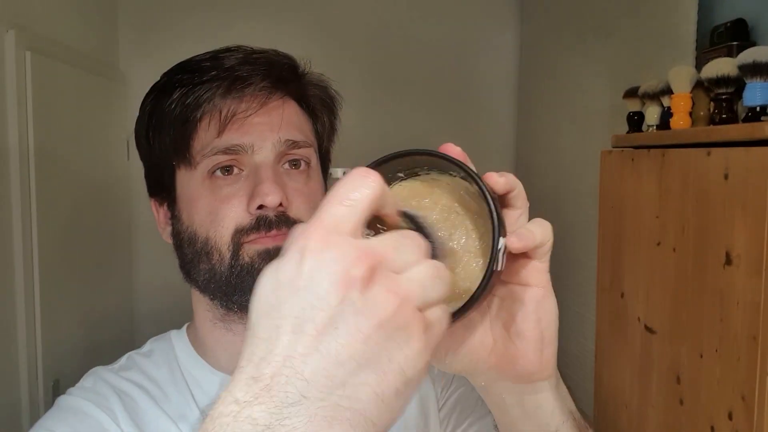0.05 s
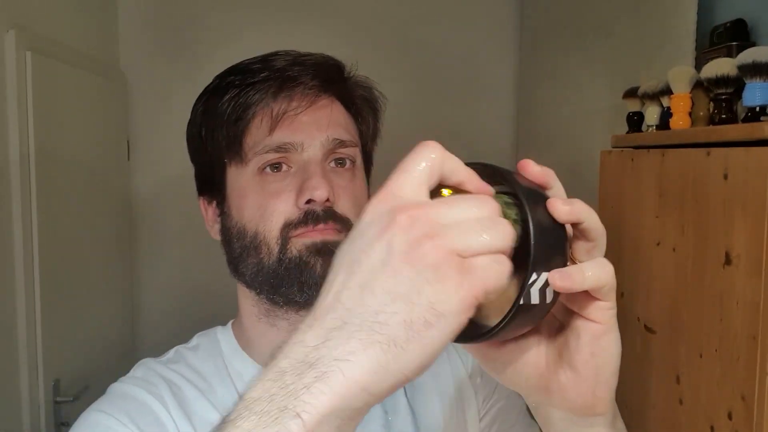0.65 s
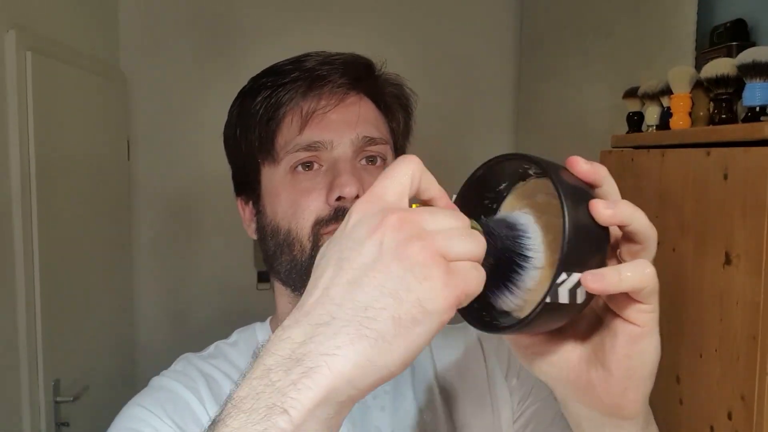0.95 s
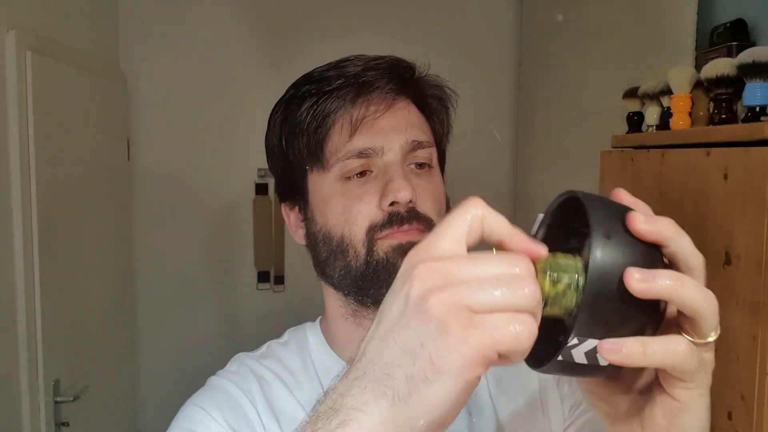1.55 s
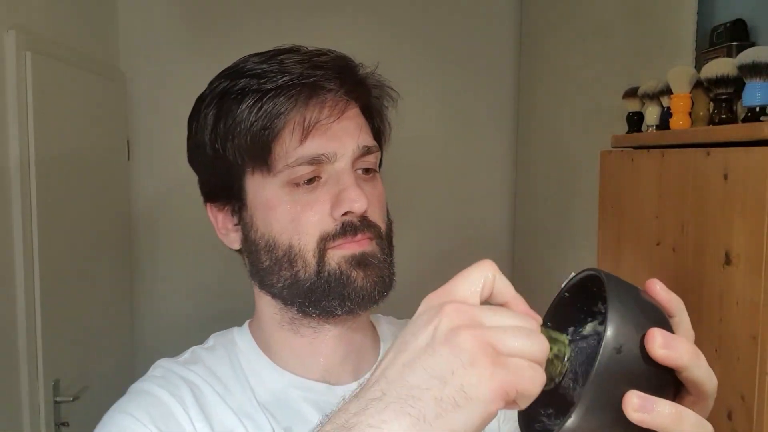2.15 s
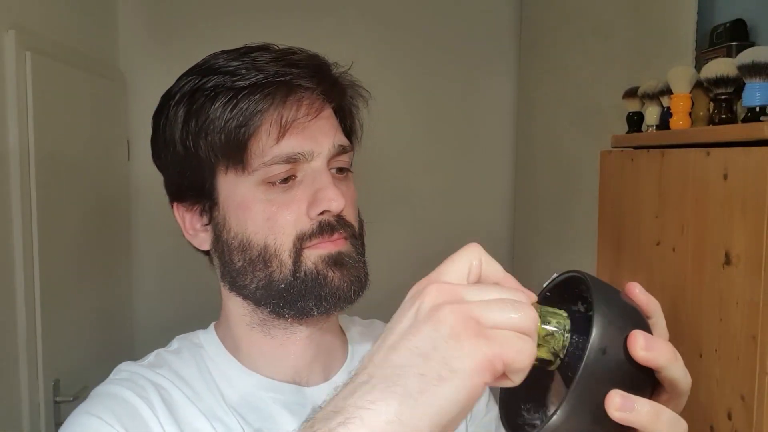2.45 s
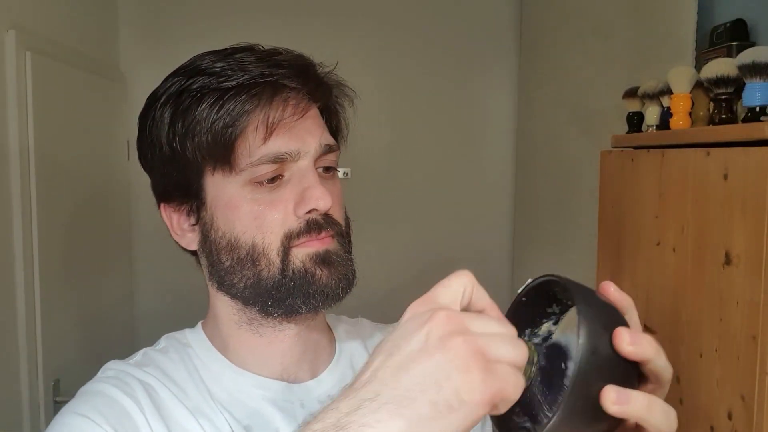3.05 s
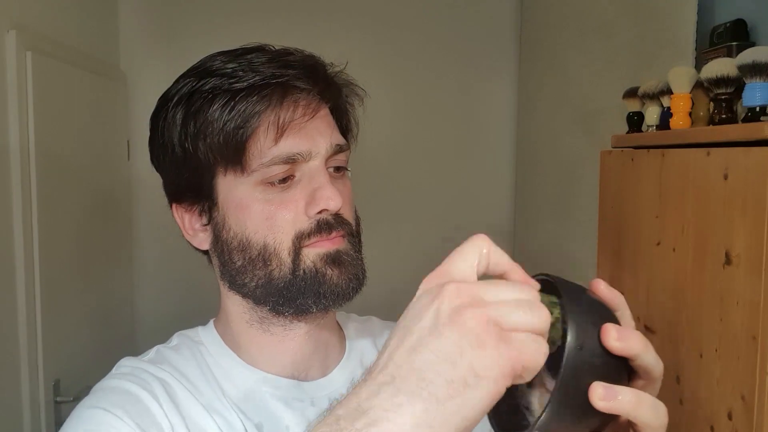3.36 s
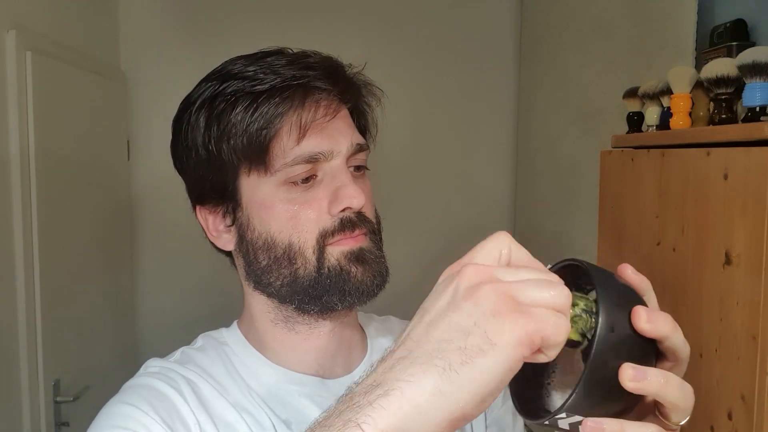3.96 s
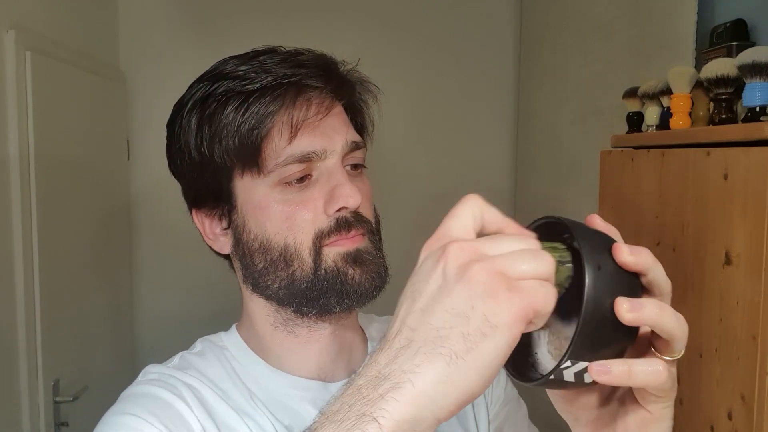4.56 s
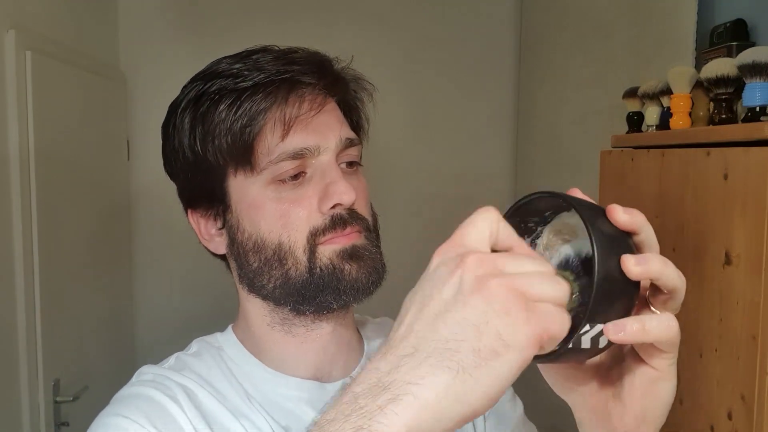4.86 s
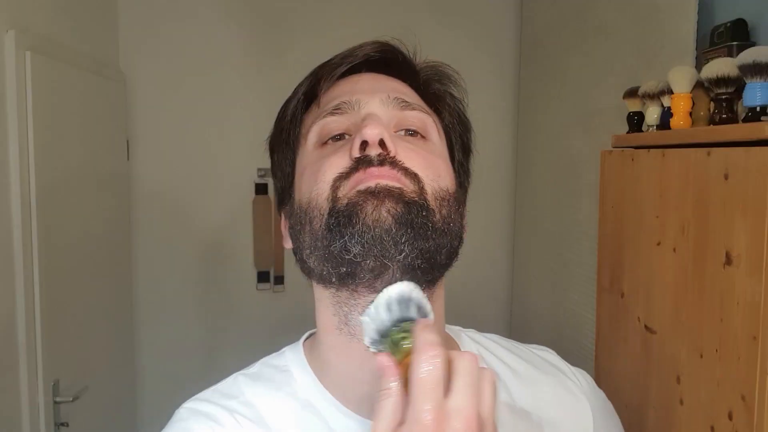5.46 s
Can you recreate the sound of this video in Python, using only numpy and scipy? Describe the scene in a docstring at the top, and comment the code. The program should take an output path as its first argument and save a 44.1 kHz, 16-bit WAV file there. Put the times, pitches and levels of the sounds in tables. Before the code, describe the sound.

In a small, quiet bathroom, a light ceramic clink opens a run of fast, soft brush sweeps in a bowl of shaving soap, with bristles flicking. Two bright knocks of the handle on the bowl stand out as the loudest sounds. Firmer, rhythmic turns follow, the foam fizzing, squelching and popping nearby, before a brief, faint rub and scratch of the brush on beard and skin.

```python
"""Whipping up shaving lather

A damp brush swirls over soap in a hand-held ceramic bowl in a small bathroom, lightly, then firmly.
Tiny bubbles break and sound the hollow of the bowl, lather squelches and pops, bristles hiss and flick.
The handle clinks on the bowl three times. At the end the brush rubs the lather into a bearded neck."""
import sys
import numpy as np
from scipy import signal
from scipy.fft import rfft, irfft
from scipy.io import wavfile

SR = 44100
rng = np.random.default_rng(int(sys.argv[2]) if len(sys.argv) > 2 else 0)


def file_out(sig):
    """Save sig as 16-bit WAV at sys.argv[1]."""
    # one column per channel
    cols = np.atleast_2d(sig).T
    # limit, then scale
    lim = np.clip(cols, -1, 1)
    pcm = np.round(lim * 32767).astype(np.int16)
    wavfile.write(sys.argv[1], SR, pcm)


N = 251811
TIME = np.arange(N) / SR
HZ = np.maximum(np.fft.rfftfreq(N, 1 / SR), 1)
NECK_START_S = 5.258

# Levels are relative: the functions add their own gains. t60 is the time a sound takes to fade by 60 dB.
# light sweeps over the soap, about eight a second: t/s, hiss/dB, lather/dB
LIGHT_SWEEPS = [(0.035, -66.5, -82), (0.15, -72.5, -91), (0.263, -72.5, -92), (0.399, -71.5, -89),
                (0.479, -76.5, -91.5), (0.529, -73.5, -84), (0.664, -65, -72.5), (0.715, -74, -71.5),
                (0.864, -70, -83), (0.938, -68, -70), (1.03, -72.5, -84), (1.075, -67.5, -77.5),
                (1.182, -63.5, -67.5), (1.265, -73, -65.5), (1.403, -72, -73), (1.475, -75.5, -71),
                (1.575, -84, -73), (2.234, -74, -73), (2.382, -82, -67.5), (2.445, -80, -68)]
# firm turns, about four a second, each a push and a return:
# t/s, push/dB, rise/s, return delay/s, return/dB, squelch/dB, hiss/dB
FIRM_TURNS = [(2.685, -60, 0.017, 0.094, -63.5, -71, -73), (2.914, -54, 0.02, 0.096, -62, -74.5, -69.5),
              (3.154, -54.5, 0.017, 0.1, -61, -71, -71), (3.378, -58.5, 0.028, 0.068, -58, -68.5, -73),
              (3.653, -55.5, 0.049, 0.12, -61, -72, -77), (3.875, -59.5, 0.025, 0.065, -65, -68, -86),
              (4.208, -56, 0.045, 0.063, -65, -73.5, -75.5), (4.458, -56.5, 0.065, 0.12, -57, -71, -75),
              (4.678, -55, 0.035, 0.11, -58, -62, -71), (4.885, -57, 0.064, 0.13, -58.5, -66.5, -73.5),
              (5.11, -60, 0.051, 0.115, -58.5, -64, -72.5)]
# notes of the air in the bowl: f/Hz, width/Hz, level under a firm brush/dB, under a light brush/dB
BOWL_AIR_NOTES = [(838, 41, 4, -2.5), (1109, 83, 0.5, 1), (1228, 250, -6.5, -2.5), (1375, 66, 1.5, -1.5),
                  (1610, 75, -7.5, -9), (2145, 160, -13, -5.5), (2557, 220, -10.5, -5),
                  (3525, 290, -10.5, -9.5)]
# pockets of lather bursting: t/s, level/dB, f/Hz
LATHER_POPS = [(1.21, -62, 1153), (2.899, -50, 1640), (3.143, -49, 854), (3.649, -50, 837),
               (4.047, -52, 1310), (4.208, -47, 1335), (4.446, -44.5, 964), (4.606, -44.5, 1090),
               (4.677, -45, 1270), (4.881, -42.5, 1217), (5.104, -43, 824), (5.112, -41.5, 833),
               (5.221, -48, 1160)]
# tufts of bristles springing free: t/s, level/dB
TUFT_FLICKS = [(0.6515, -38), (0.6553, -36.5), (0.659, -45), (0.714, -45), (0.8644, -40), (0.931, -39),
               (1.0236, -57.5), (1.0787, -46), (1.1744, -47), (5.2927, -44.5)]
# handle hitting the bowl: t/s, ring/dB, brightness/dB per octave, spot (0 rim, 1 inner wall), knock/dB
HANDLE_HITS = [(-0.016, -21.5, -4, 0.54, -28), (1.6428, -9.5, 1.8, 0.27, -11),
               (1.6514, -14, -6, 0.11, -22.5), (1.9807, -14, 2.1, 0.82, -11.5), (1.9856, -20, -2, 1, -14.5)]
# notes of the bending ceramic: f/Hz, level hit on the rim/dB, on the wall/dB, t60/s, left minus right/dB
CERAMIC_NOTES = [(1610.6, -3.5, -0.5, 0.67, -1), (1696, -14, -16, 0.12, -3.5),
                 (3700, -7.5, -28, 0.31, -10.5), (3797, -12, -10, 0.24, -2.5),
                 (6484, -18.5, -16.5, 0.2, -7), (9726, -24.5, -25.5, 0.066, -11),
                 (13400, -39.5, -26, .1, -5.5)]
# strokes over the beard: t/s, level/dB
BEARD_STROKES = [(5.299, -68), (5.39, -64), (5.468, -68), (5.515, -69.5), (5.61, -66.5), (5.695, -67.5)]

# tone colours, or how strong each pitch is in a noise: f/Hz, level/dB
LATHER_COLOUR = [(400, -18), (750, -4.5), (1200, 2), (2300, -1.5), (3000, -6.5), (3700, -3), (5500, -9.5),
                 (6600, -14), (7400, -26), (9000, -17), (15000, -29)]  # breaking bubbles
SQUELCH_COLOUR = [(100, -22), (250, -1), (450, 4.5), (650, 10.5), (900, -5.5), (1600, -25)]  # squeezed lather
BRISTLE_COLOUR = [(1500, -11), (3000, -8), (4200, 0), (6200, -1), (7400, -6.5), (8800, 1.5), (11500, -2),
                  (13500, 1), (15000, -8.5), (16000, -8.5)]  # sliding tips
KNOCK_COLOUR = [(100, -40), (400, -17), (800, -13), (1200, -3.5), (1500, 10), (2000, 4), (2600, -2.5),
                (3200, -10), (4000, -0.5), (5500, -19), (6700, -14), (7500, -41.5), (13800, -21.5),
                (15500, -45)]  # handle meeting ceramic
SKIN_COLOUR = [(53, -34), (90, -17), (214, 4), (247, -9), (382, 0.5), (758, -3), (931, -2), (1290, -11),
               (1600, -1), (2080, -26), (3520, -120)]  # rubbed skin
BEARD_COLOUR = [(800, 1), (1600, -0.5), (2600, -4.5), (4000, -4), (6000, -7.5), (7500, -26), (12000, -27)]  # scratched beard
AIR_COLOUR = [(25, -13), (50, -3.5), (75, 9), (110, -4.5), (155, -0.5), (250, -4.5), (600, -13.5),
              (950, -13.5), (1250, -4.5), (2800, -19.5), (5000, -8), (7300, -15.5), (13500, -10.5),
              (15500, -19)]  # the quiet room

# how long the bathroom echoes: f/Hz, t60/s
ECHO_TIMES = [(150, 0.77), (400, 0.55), (1500, .41), (4000, 0.38), (7000, .35), (14000, 0.33)]
# standing waves, low notes that linger between the walls: f/Hz, level/dB, t60/s
ROOM_NOTES = [(150, -1, 0.92), (220, 1.5, 0.94), (231, -2, .5), (352.3, -0.5, 0.63), (417, -1.5, 0.51)]
# which side is louder: f/Hz, left minus right/dB
STEREO_BALANCE = [(60, -5.5), (110, -2), (200, -5.5), (380, 0.5), (700, -8), (1290, -4), (2380, -3.5),
                  (4400, -15.5), (8120, -12.5), (15000, -21)]
# how alike left and right are: f/Hz, likeness (1 the same, 0 unrelated)
STEREO_LIKENESS = [(60, 0.86), (130, 0.29), (290, 0.21), (640, 0.93), (1410, -0.033), (3100, 0.095),
                   (6820, -0.22), (15000, 0.19)]


def brush_motion(foam_lag_s=0.02, hiss_follows=0.71):
    """The hand's motion as three loudness curves: lather stirred, lather squeezed, tips sliding."""
    # Strokes add up as powers (gain squared). Foam answers later and more slowly than the tips.
    foam_sweeps = [(s + foam_lag_s, db) for s, _, db in LIGHT_SWEEPS]
    stirred = swells(foam_sweeps, rise_s=0.029, fall_s=0.075) ** 2
    squeezed = from_db(-25) ** 2 * stirred  # a light sweep hardly squelches
    tips = swells([(s, db) for s, db, _ in LIGHT_SWEEPS], rise_s=0.022, fall_s=0.013) ** 2
    stirred += from_db(-68) ** 2 * (TIME > FIRM_TURNS[0][0])  # steady drag between firm pushes
    for s, push_db, rise_s, return_s, return_db, squelch_db, hiss_db in FIRM_TURNS:
        push = swells([(s, push_db)], rise_s, fall_s=0.0506)
        back = swells([(s + return_s, return_db)], rise_s=0.0324, fall_s=0.043)
        turn = np.hypot(push, back)
        stirred += turn ** 2
        squeezed += swells([(s, squelch_db)], rise_s=0.016, fall_s=0.12) ** 2
        tips += (from_db(hiss_db) * (turn / from_db(push_db)) ** hiss_follows) ** 2
    on_neck = swells([(s, -74.5) for s, _ in BEARD_STROKES], rise_s=0.02, fall_s=0.063) ** 2
    tips = np.where(TIME < NECK_START_S, tips, on_neck)
    tips += from_db(-85.5) ** 2  # tips that barely move still hiss a little
    return np.sqrt([stirred, squeezed, tips])


def lather(room, stirred, squeezed, hollow_db=11.0, clump_db=2.5):
    """Countless bubbles break and sound the hollow of the bowl; pressing deeper adds a low squelch."""
    firmness = np.interp(stirred, from_db([-70, -60]), [0, 1])
    swish = coloured(clicks(per_s=6400, spread_db=3.5), LATHER_COLOUR)
    inside = coloured(clicks(per_s=2000, spread_db=1.0), LATHER_COLOUR)
    for k, (hz, width_hz, firm_db, light_db) in enumerate(BOWL_AIR_NOTES):
        level_db = hollow_db + firmness * firm_db + (1 - firmness) * light_db
        level_db += clump_db * flutter(per_s=43)  # foam collapses in clumps, favouring notes by turns
        swish = swish + (-1) ** k * resonate(inside * from_db(level_db), hz, width_hz)
    swish = in_room(swish, room, echo_db=-2.5)[:, :N]
    swish *= from_db(0.14) / np.std(swish.mean(axis=0))
    squelch = from_db(-1.5) * coloured(clicks(per_s=4000, spread_db=4.5), SQUELCH_COLOUR)
    return (stirred * swish + squeezed * squelch) * (TIME < NECK_START_S)


def pops(room, t60=0.031, rise_s=0.00014, fizz_db=-15.5):
    """A larger pocket of air bursts with a short hollow note and a spit of foam."""
    out, t = np.zeros((2, N)), TIME[:SR // 10]
    fizz = from_db(fizz_db) * coloured(rng.standard_normal((2, N)), LATHER_COLOUR)
    for k, (s, db, hz) in enumerate(LATHER_POPS):
        note = np.sin(2 * np.pi * hz * t) * pan(-7.5)
        spit = fizz[:, k * len(t):(k + 1) * len(t)]
        fade = from_db(db - 60 * t / t60) * (1 - np.exp(-t / rise_s))
        add(out, s, in_room((note + spit) * fade, room, echo_db=1.0))
    return out * (TIME < NECK_START_S)


def bristles(room, sliding, hiss_db=3.0, clump_db=1.2, flick_db=-10.5, flick_t60=0.011):
    """The tips slide with a fine, uneven crackle; now and then a tuft springs free."""
    hiss_gain = sliding * from_db(hiss_db + clump_db * flutter(per_s=130))
    out = hiss_gain * coloured(clicks(per_s=5200, spread_db=-1.0), BRISTLE_COLOUR)
    spray = coloured(rng.standard_normal((2, N)), BRISTLE_COLOUR)
    t = TIME[:SR // 10]
    for k, (s, db) in enumerate(TUFT_FLICKS):
        flick = spray[:, k * len(t):(k + 1) * len(t)] * from_db(db + flick_db - 60 * t / flick_t60)
        add(out, s, in_room(flick, room, echo_db=-1.0))
    return out


def clinks(free_s=0.013, settle_t60=0.032, knock_gain_db=-9, knock_t60=0.04, thud_db=9.5):
    """The handle knocks on the bowl, which rings freely until the handle settles against it."""
    out, t = np.zeros((2, N)), TIME[:SR // 4]
    knocks = coloured(rng.standard_normal((2, N)), KNOCK_COLOUR, lean=0.87)
    thuds = from_db(thud_db) * signal.sosfiltfilt(signal.butter(2, 800, fs=SR, output="sos"), knocks)
    onset = 1 - np.exp(-t / 0.00012)
    settle_db = -60 * np.maximum(t - free_s, 0) / settle_t60
    arrival = t - np.array([[0], [0.000075]])  # the ring reaches the left side first
    for k, (s, ring_db, bright_db, spot, knock_db) in enumerate(HANDLE_HITS):
        room = bathroom()
        for hz, rim_db, wall_db, t60, lean_db in CERAMIC_NOTES:
            octaves_up = np.log2(hz / CERAMIC_NOTES[0][0])
            struck_db = ring_db + (1 - spot) * rim_db + spot * wall_db + bright_db * octaves_up
            fade = onset * from_db(struck_db - 60 * t / t60 + settle_db)
            note = without_bass(fade * np.sin(2 * np.pi * hz * arrival), hz=900)
            add(out, s, in_room(note * pan(lean_db), room, echo_db=-3.5))
        knock = (knocks + spot * thuds)[:, k * len(t):(k + 1) * len(t)]  # the wall thuds, the rim does not
        knock *= onset * from_db(knock_db + knock_gain_db - 60 * t / knock_t60)
        add(out, s, in_room(without_bass(knock, hz=170), room, echo_db=3.0))
    return out


def neck(rub_db=-69, scratch_db=1.0):
    """Lather on skin is a dull rub, with a light scratch of beard on each stroke."""
    rub = from_db(rub_db - flutter(per_s=20))
    skin = rub * coloured(clicks(per_s=18000, spread_db=-1.0), SKIN_COLOUR, lean=1.34)
    scratch = from_db(scratch_db) * swells(BEARD_STROKES, rise_s=0.02, fall_s=0.063)
    beard = scratch * coloured(clicks(per_s=1800, spread_db=1.5), BEARD_COLOUR)
    return (skin + beard) * (TIME >= NECK_START_S)


def bathroom(build_s=0.0031, notes_db=-47.0, alike_below_hz=500):
    """The room's echo: reflections thicken quickly, the treble dies first and a few low notes linger."""
    t = TIME[:SR * 7 // 10]
    hz = np.maximum(np.fft.rfftfreq(len(t), 1 / SR), 1)
    mid, side = rfft(rng.standard_normal((2, len(t))))
    alike = 1 / (1 + (hz / alike_below_hz) ** 2)  # long waves reach both sides together
    noise = np.sqrt((1 + alike) / 2) * mid + np.sqrt((1 - alike) / 2) * side * [[1], [-1]]
    centres, t60s = np.transpose(ECHO_TIMES)
    tail = 0
    for share, t60 in zip(np.eye(len(centres)), t60s):
        fade = from_db(-60 * t / t60) * (1 - np.exp(-t / build_s))
        band = irfft(noise * np.interp(np.log(hz), np.log(centres), share), len(t))
        tail = tail + band * fade / np.linalg.norm(fade)
    notes = sum(np.sin(2 * np.pi * f * t) * from_db(db - 60 * t / t60) for f, db, t60 in ROOM_NOTES)
    return tail + from_db(notes_db) * notes / 2


def still_air(level_db=-75):
    """The faint, steady rumble and hiss of the quiet room."""
    return from_db(level_db) * coloured(rng.standard_normal((2, N)), AIR_COLOUR, lean=0.55)


def in_room(sound, room, echo_db):
    """A sound plus its echo, whose energy is echo_db relative to the sound's own."""
    tail = signal.fftconvolve(sound, room, axes=1)
    tail /= np.linalg.norm(tail, axis=1, keepdims=True)
    tail *= from_db(echo_db) * np.linalg.norm(sound, axis=1, keepdims=True)
    tail[:, :sound.shape[1]] += sound
    return tail


def swells(strokes, rise_s, fall_s):
    """Loudness curve of strokes (t/s, level/dB): each swells smoothly to its peak and dies away."""
    power = 0
    for s, db in strokes:
        away = np.where(TIME < s, ((TIME - s) / rise_s) ** 2 / 2, (TIME - s) / fall_s)
        power = power + from_db(db) ** 2 * np.exp(-2 * np.minimum(away, 20))
    return np.sqrt(power)


def clicks(per_s, spread_db):
    """Two unrelated streams of tiny clicks of uneven size, with an average power of one."""
    sizes = from_db(spread_db * np.minimum(rng.exponential(1, (2, N)), 4))
    streams = rng.standard_normal((2, N)) * sizes * (rng.random((2, N)) < per_s / SR)
    return streams / np.sqrt(np.mean(streams ** 2) + 1e-20)


def flutter(per_s):
    """A random wobble with a typical size of one."""
    return np.interp(TIME * per_s, np.arange(1000), 1.2 * rng.standard_normal(1000))


def coloured(pair, colour, lean=0.94):
    """Give two noises a tone colour and spread them left and right; their average has a power of one."""
    mid, side = rfft(pair) * from_db(at_hz(colour, HZ))
    alike = np.clip(at_hz(STEREO_LIKENESS, HZ), -.95, .95)
    both = np.sqrt(1 + alike) * mid + np.sqrt(1 - alike) * side * [[1], [-1]]
    out = irfft(both * pan(lean * at_hz(STEREO_BALANCE, HZ)), N)
    return out / np.std(out.mean(axis=0))


def resonate(x, hz, width_hz):
    """Let through a band of pitches around one note, as a hollow does."""
    r = np.exp(-np.pi * width_hz / SR)
    feedback = [1, -2 * r * np.cos(2 * np.pi * hz / SR), r * r]
    return signal.lfilter(np.array([1, 0, -1]) * (1 - r * r) / 2, feedback, x)


def without_bass(x, hz):
    """A small object gives off little sound below its lowest note."""
    return signal.sosfilt(signal.butter(2, hz, "high", fs=SR, output="sos"), x)


def from_db(db):
    """Turn decibels into a gain to multiply by."""
    return 10 ** (np.asarray(db) / 20)


def at_hz(points, hz):
    """Read between the rows of a table, giving every octave equal room."""
    f, value = np.transpose(points)
    return np.interp(np.log(hz), np.log(f), value)


def pan(lean_db):
    """Left and right gains that keep the total power; positive leans left."""
    pair = from_db(np.array([[.5], [-.5]]) * lean_db)
    return pair / np.sqrt(np.mean(pair ** 2, axis=0))


def add(out, s, sound):
    """Mix in a stereo sound at s seconds, which may lie before the start."""
    at = round(s * SR)
    sound = sound[:, max(-at, 0):N - at]
    out[:, max(at, 0):max(at, 0) + sound.shape[1]] += sound


def scene():
    """Brush, bowl, neck and the still air of the room, added together."""
    room = bathroom()
    stirred, squeezed, sliding = brush_motion()
    air = still_air()
    bowl = clinks() + lather(room, stirred, squeezed) + pops(room)
    return bowl + bristles(room, sliding) + neck() + air


def record(dry, ceiling=0.86, cutoff_hz=15500):
    """Round off the loudest peaks and cut the highest treble."""
    rounded = ceiling * np.tanh(dry / ceiling)
    return signal.sosfilt(signal.ellip(10, .1, 80, cutoff_hz, fs=SR, output="sos"), rounded)


dry = scene()
out = record(dry)
file_out(out)
```